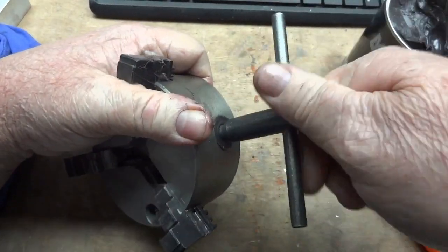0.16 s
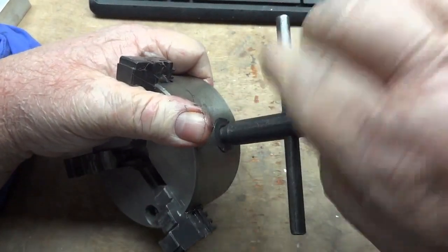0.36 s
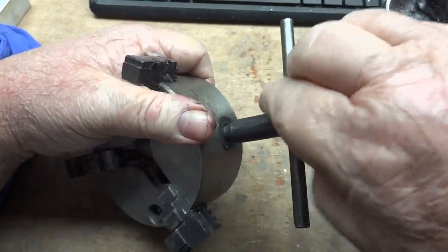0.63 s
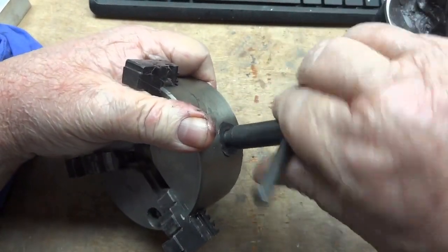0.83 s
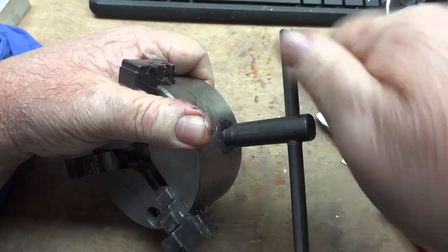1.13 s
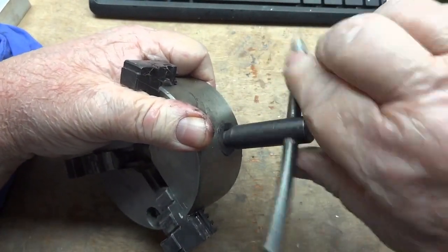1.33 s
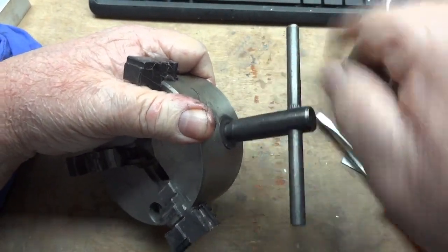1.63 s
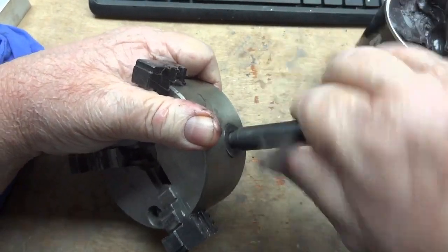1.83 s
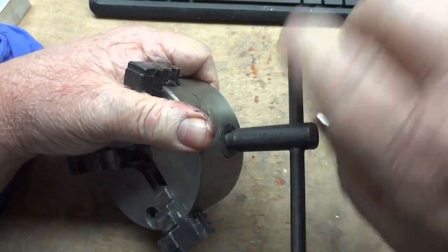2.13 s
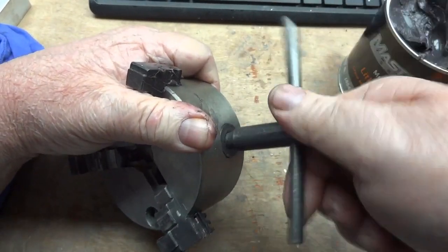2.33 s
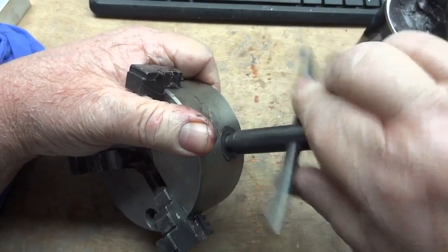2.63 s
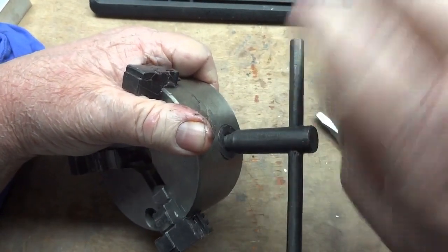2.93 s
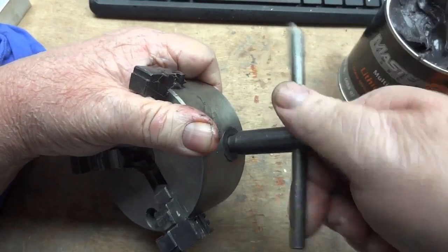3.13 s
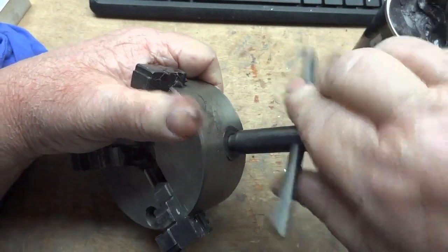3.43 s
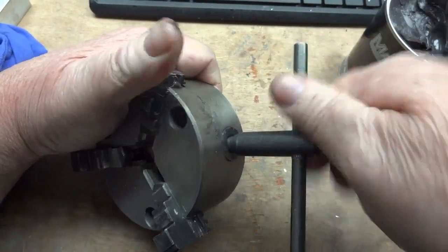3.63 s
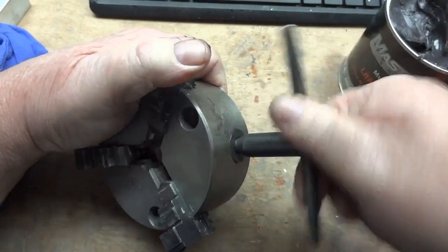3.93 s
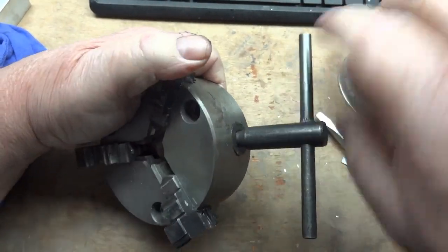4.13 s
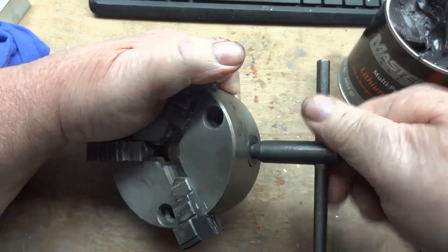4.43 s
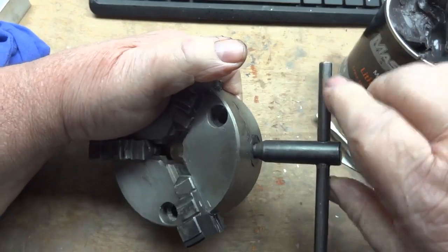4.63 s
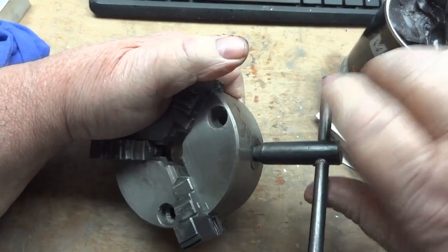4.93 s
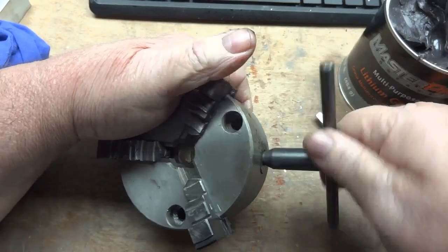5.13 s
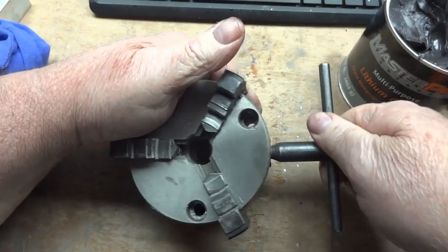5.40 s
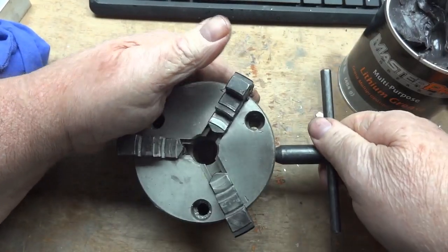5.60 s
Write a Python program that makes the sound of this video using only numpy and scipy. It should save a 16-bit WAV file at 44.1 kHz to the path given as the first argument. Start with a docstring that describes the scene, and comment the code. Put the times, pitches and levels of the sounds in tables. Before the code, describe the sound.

Steady low machine hum and airy hiss lie behind close, dry metal handling. Steel teeth tick and clack in tight irregular groups, each with a brief scrape and the chuck rocking woodenly on the bench. Bursts are sparse at first, grow denser and stronger in the middle, with one bright knock of the key, then fade to weak ticks and a swelling smooth skin-on-metal rub. Little reverberation.

```python
"""Bright steel clicks come first, in a quick cluster over the steady hum and hiss of a workshop machine.
A hand turns a chuck key in a small lathe chuck by half turns: pinion teeth strike the scroll (damped modes under
a noise snap), the scroll scrapes in its groove (clumped, coloured noise) and the chuck rocks on a wooden bench
(low modes with a slower rise). Faint palm noise swells at the end as a palm slides over the steel.
A short diffuse reverberation follows the hits."""
import sys
import numpy as np
from scipy import signal
from scipy.fft import rfft, irfft, next_fast_len
from scipy.io import wavfile
from scipy.ndimage import map_coordinates

SR = 44100
rng = np.random.default_rng(int(sys.argv[2]) if len(sys.argv) > 2 else 0)


def persist_wave(psi):
    """Save psi, clipped to +-1, as 16-bit WAV."""
    counts = np.round(np.clip(psi, -1, 1) * 32767).astype(np.int16)
    wavfile.write(sys.argv[1], SR, np.atleast_2d(counts).T)


N = 254015

# Machine hiss, relative spectrum: (frequency [Hz], density [dB per Hz])
MACHINE_SPECTRUM = [(15, -56), (25, -36), (58, -15), (88, -34), (114, -9.5), (252, -5), (301, -4.5),
                    (389, -6.5), (516, -17.5), (557, -12.5), (1600, -9), (6370, -33.5), (8030, -16.5),
                    (10600, -40), (11500, -48), (15000, -74), (22000, -120)]
# Broad resonances of its housing: (centre [Hz], width [Hz], boost [dB])
HOUSING_RESONANCES = [(122, 20, 5), (295, 45, 4), (1370, 250, 3), (2580, 200, 2), (7470, 100, 3),
                      (7730, 110, 4.5), (8070, 70, 3)]
# Left-right correlation of the hiss: (frequency [Hz], correlation [1])
HISS_CORRELATION = [(25, 0.81), (60, 0.8), (220, .96), (840, 0.75), (3120, 0.86), (11000, 1)]
# Motor tones: (frequency [Hz])
MOTOR_HZ = [121, 291, 526.5, 701, 7733, 8080, 8408]
# Unsteadiness of each motor tone: (central level [dB rms], scale of frequency wander [Hz])
MOTOR_LEVELS = [(-59.5, 4), (-58, 5), (-56.5, 2.5), (-63.5, 3), (-69, 9), (-72, 6), (-68.5, 4)]
MACHINE_DB = -46.5  # central level of the hiss, rms

# Bench rumble under the forearms: (time [s], level [dB])
BENCH_LEVEL = [(0, -49.5), (.1, -50.5), (.38, -67), (.48, -52), (.66, -60.5), (1.44, -60), (1.57, -45.5),
               (1.63, -58), (1.92, -55), (2.0, -46.5), (2.15, -71), (2.45, -63), (2.58, -49), (2.66, -59),
               (2.82, -51), (2.94, -59), (3.27, -50), (3.38, -63), (3.48, -46.5), (3.61, -46), (3.75, -61),
               (4.04, -53), (4.22, -56), (4.29, -47), (4.47, -55), (4.76, -58), (4.86, -45.5),
               (5.07, -57.5), (5.28, -50.5), (5.66, -61), (5.76, -52)]
# Its relative spectrum: (frequency [Hz], density [dB per Hz])
BENCH_SPECTRUM = [(20, -31), (50, -11), (85, -2), (125, 1), (170, -2), (260, -30)]
# Reverberation: (frequency [Hz], decay time T60 [s])
ROOM_DECAY = [(300, 0.04), (2000, 0.085), (10000, 0.19)]

# Palm on the chuck face: (time [s], level [dB]); the first level also holds before its time
PALM_LEVEL = [(5.3, -55.5), (5.44, -50), (5.5, -44), (5.6, -44.5), (5.7, -44), (5.76, -43.5)]
# Its relative spectrum: (frequency [Hz], density [dB per Hz])
PALM_SPECTRUM = [(500, -33), (1200, 2), (1600, -6), (2500, -5.5), (4100, -8), (6000, -10.5), (8000, -10),
                 (11000, -15)]

# Strokes of the key, half turns and nudges: (full speed from [s], until [s], rise [dB/s], fall [dB/s],
# rumble level [dB], scrape level [dB], hiss level [dB])
STROKES = [(.09, .14, 300.5, 150, -43.5, -43, -53), (.98, 1.076, 150.5, 261, -42, -44, -50),
           (1.511, 1.58, 120.5, 299, -40, -42, -48), (1.68, 1.699, 807, 200.5, -43, -52, -54),
           (1.972, 2.001, 250, 298.5, -33, -42, -43.5), (2.365, 2.44, 449.5, 199.5, -35, -39, -47),
           (2.753, 2.83, 501.5, 298, -34.5, -39, -46), (3.159, 3.241, 400, 200, -35.5, -39, -46),
           (3.565, 3.631, 397, 250, -40, -41, -50), (3.992, 4.04, 200, 299, -35, -39, -43),
           (4.409, 4.478, 201, 251.5, -42.5, -42, -45.5), (4.717, 4.738, 804, 301, -45.5, -50, -52),
           (4.792, 4.807, 394.5, 403, -53.5, -50, -51), (5.14, 5.22, 149, 150, -45, -49, -57)]
# Levels between strokes: (rumble [dB], scrape [dB], hiss [dB])
REST_LEVELS = [-55, -54, -58.5]
SETTLE_DB, SETTLE_DB_PER_S = -13, 40  # slow creep after a stroke: start under its level, then fall
# Friction shaken loose by a tooth, under its peak: (rumble [dB], scrape [dB], hiss [dB])
TOOTH_JOLT = [-26, -21, -40.5]
JOLT_T60_S = 0.12
KNOCK_JOLT_DB = -24  # hiss shaken loose by a knock, under the peak of the cross bar
# Relative spectra of the three frictions: (frequency [Hz], density [dB per Hz])
RUMBLE_SPECTRUM = [(40, -49), (90, -2.5), (130, -17.5), (300, 6), (600, 3.5), (900, -2), (1300, -25)]
SCRAPE_SPECTRUM = [(500, -18.5), (1000, -3.5), (1700, -3), (2190, -2.5), (2600, -1), (3000, -7.5),
                   (3700, -12.5), (5000, -40)]
HISS_SPECTRUM = [(2500, -19), (4200, 2.5), (5700, -4), (7500, -2.5), (9500, -9), (11500, -17.5)]

# Chuck rocking on the bench: (time [s], rise constant [ms] before limiting, nominal peak [dB],
# landing place [1]: 0 bench leg, 1 board, 2 chuck body, 3 loose jaws)
ROCKING = [(.095, 2.5, -36, 3), (.13, 1.8, -29, 2.85), (.306, 6.7, -31, 0.83), (.318, 5.6, -34.5, 0.87),
           (.348, 2.6, -34, 0.78), (.366, 3.8, -40, .1), (.51, 7.3, -37.5, 1), (.885, 2.2, -37, .6),
           (.99, 3.6, -37, 2.6), (1.008, 2, -41, 1), (1.016, 1.4, -28.5, 2.6), (1.027, 4.1, -42, .4),
           (1.059, .7, -31, 3.2), (1.078, 3.1, -31.5, 1.3), (1.178, 6, -35, 0.91), (1.187, 2.7, -31, 0.62),
           (1.407, 8.8, -34.5, 1), (1.432, 2.9, -39, .1), (1.505, 1.5, -32, 1.2), (1.532, 5.1, -33, 2),
           (1.589, 1, -36, 3.8), (1.674, 4.3, -30.5, 1.58), (1.707, 3.7, -38, .9), (1.922, 1.4, -30.5, 1),
           (1.953, 4.5, -35, 0.35), (1.976, 9.1, -28, 2), (2.31, 2.6, -35, 0.84), (2.358, .9, -28, 2),
           (2.369, 4.1, -25, 1.6), (2.4, 1.8, -23, 1.65), (2.411, 3, -29, 1.9), (2.466, 6.5, -30.5, 0.22),
           (2.498, 2.2, -32, 0.58), (2.527, 5.7, -42, 2), (2.782, 1.4, -23, 2.8), (2.797, 9.7, -27, 0.98),
           (2.832, 7.6, -32.5, 1), (3.099, 2.7, -35.5, 0.77), (3.113, 5.1, -31, 0.57),
           (3.181, 0.77, -23.5, 2.2), (3.2, 1.5, -30, 2.5), (3.213, 1.6, -25, 2.34),
           (3.258, 1.3, -23, 2.18), (3.491, 6.7, -30, .5), (3.58, 5, -33, 2.04), (3.589, 3.4, -26.5, 1),
           (3.609, 3.1, -31, 2.3), (3.636, 1, -30, 2.8), (3.74, 7.5, -38, 0.9), (3.908, 6.7, -30, .7),
           (3.95, 2.7, -35, 1.3), (4.006, .9, -27, 2), (4.014, 12, -26.5, .8), (4.044, 2.8, -24.5, 1.56),
           (4.076, 5.9, -32, .3), (4.2, 4.1, -33, 0.54), (4.235, 2.1, -33, 0.37), (4.398, 3.3, -29, 0.53),
           (4.419, 0.93, -26.5, 1.4), (4.567, 23, -26.5, .1), (4.603, 1.9, -34.5, .1),
           (4.719, 1.6, -29, 0.46), (4.848, 1.4, -25, 2.56), (4.871, 4.4, -30.5, 0.081),
           (4.943, 3.5, -35.5, .5), (5.09, 4, -43, 1.7), (5.138, 1.8, -28, 0.34), (5.226, 0.98, -33, 1.5),
           (5.28, 5.9, -35.5, 0.32)]
# Modes of the bench leg, board, chuck body and jaws: (frequency [Hz], relative level [dB], T60 [s])
LEG_MODES = [(273.6, 0, 0.058)]
BOARD_MODES = [(358, 0, 0.058)]
BODY_MODES = [(560, -10, 0.022), (598, 1.5, 0.043)]
JAW_MODES = [(974, -3.5, 0.028), (1273, 2, 0.0078)]
FADE_DB_PER_PART = 12.5  # parts further from the landing ring less
SMALL_THUD_DB, SMALL_THUD_RISE_MS = 3.5, 3  # small chance thuds: level over the rumble, rise constant

# Pinion teeth striking the scroll: (time [s], nominal peaks of scroll [dB], pinion [dB], key [dB])
TEETH = [(.0192, -26, -37, -55), (.0692, -34, -44, -45), (.082, -34, -32, -50), (0.0866, -14.5, -37, -48),
         (.097, -31, -36, -44), (0.1174, -22, -30, -32), (.1214, -17, -34, -47), (.132, -20, -45, -41),
         (0.1648, -24, -39, -44), (.919, -21.5, -22.5, -38), (.9742, -19.5, -22.5, -38),
         (.9862, -25, -40, -46), (1.018, -30, -29, -47), (1.0246, -29, -27, -37), (1.0573, -32, -30, -42),
         (1.0649, -27, -23, -45), (1.072, -29, -46, -43), (1.4655, -27, -38, -47),
         (1.4724, -20, -23.5, -41), (1.5042, -26, -36, -40), (1.5066, -20, -23, -33),
         (1.5316, -16, -39, -22.5), (1.534, -18.5, -18, -34), (1.5445, -28, -29, -38),
         (1.5592, -15.5, -38, -28.5), (1.5683, -27, -34, -38), (1.5912, -19.5, -29, -39),
         (1.9254, -24.5, -26, -44), (1.9292, -23, -32, -43), (1.954, -20, -43, -41), (1.961, -30, -22, -38),
         (1.974, -20.5, -26, -33), (1.978, -37, -23, -35), (1.984, -39, -21, -34), (1.9969, -21, -23, -28),
         (2.351, -21, -26, -29), (2.3568, -28, -43, -33), (2.368, -14.5, -16.5, -22),
         (2.372, -26, -25, -24), (2.3906, -15, -18, -24), (2.3997, -30, -24, -30), (2.4138, -28, -19, -34),
         (2.749, -20, -19.5, -33), (2.754, -18, -28, -39), (2.7753, -16, -18.5, -27),
         (2.7845, -28, -26, -29), (2.7946, -19, -28, -39), (2.798, -20, -21, -42), (2.8033, -31, -35, -43),
         (2.821, -23, -23, -32), (3.152, -22, -24, -31), (3.157, -16.5, -31, -26), (3.1633, -23, -36, -36),
         (3.1765, -15.5, -14, -21), (3.1823, -22, -31, -36), (3.1929, -18.5, -26, -26),
         (3.212, -16, -18.5, -25.5), (3.221, -28, -37, -34), (3.5552, -22, -23.5, -29.5),
         (3.5617, -24, -41, -44), (3.5642, -20, -35, -47), (3.5834, -29, -22, -34),
         (3.612, -20.5, -21, -45), (3.636, -22, -27, -40), (3.6489, -29, -30, -34), (3.9714, -25, -32, -43),
         (3.9977, -15, -17, -25), (4.0043, -31, -32, -25), (4.0157, -16, -25, -28),
         (4.0176, -22, -17.5, -23.5), (4.036, -20, -20, -29), (4.0412, -35, -21, -32),
         (4.387, -25, -27, -42), (4.4048, -27, -44, -45), (4.419, -18, -23, -34), (4.431, -24.5, -38, -38),
         (4.4425, -21, -23, -30), (4.865, -41, -30, -46), (5.1351, -30, -26, -37), (5.1426, -35, -31, -48),
         (5.171, -32, -24, -50), (5.1757, -36, -23.5, -50), (5.228, -30, -20, -48), (5.235, -40, -33, -46),
         (5.281, -42, -33, -52)]
# Key knocking in its slack as the hand grips or lets go:
# (time [s], nominal peaks of chuck [dB], key shank [dB], cross bar [dB])
KEY_KNOCKS = [(0.335, -37, -33, -35), (1.3994, -30.5, -32, -38), (1.492, -39, -32, -23),
              (1.6728, -26.5, -23, -20), (1.9202, -24.5, -37, -26.5), (2.2973, -39, -31.5, -53),
              (2.4687, -26.5, -27.5, -26), (2.5339, -34, -28, -33), (2.6854, -50, -34.5, -32),
              (3.0852, -17, -26.5, -24), (3.257, -28, -23, -20.5), (3.576, -27, -30, -13),
              (3.587, -24, -22, -5), (3.596, -24, -41, -27), (3.9048, -29.5, -30, -31),
              (4.717, -29.5, -30, -27), (4.8471, -42, -39, -29)]
# Modes of the socket, scroll, pinion, key shank and cross bar: (frequency [Hz], relative level [dB], T60 [s])
SOCKET_MODES = [(1076, -1.6, 0.0093), (1540, -1.4, 0.0031)]
SCROLL_MODES = [(1926, -13, 0.02), (2193, -5, 0.013), (2116, -15.5, 0.0043)]
PINION_MODES = [(2665, -4, 0.0073), (2940, -9, 0.013), (3430, -17.5, 0.027)]
SHANK_MODES = [(4210, -5.5, 0.014), (4700, -1.5, 0.0029), (5110, -12, 0.028), (5750, -7.5, 0.0079)]
BAR_MODES = [(6460, -20.5, 0.032), (7120, -7.5, 0.0058), (8020, -21, 0.016), (9400, -28, 0.0073),
             (10050, -22.5, 0.016)]
TOOTH_SOCKET_DB, TOOTH_BAR_DB = -15, -4.5  # socket under the louder of scroll and pinion, bar under key
KNOCK_SOCKET_DB, KNOCK_PINION_DB = -6, 0.5  # socket and pinion relative to the scroll
# Small chance contacts, over the scrape: (socket [dB], scroll [dB], pinion [dB], shank [dB], bar [dB])
CHATTER_LEVELS = [6.5, 10, 3, -2.5, -14]
CHATTER_SPREAD_DB = 1.5


def amp(db):
    """Decibel law: amplitude ratio of a level."""
    return 10 ** (np.asarray(db) / 20)


def unit(x):
    """Normalisation to an rms of 1."""
    return x / np.sqrt(np.mean(x ** 2) + 1e-20)


def along(points, hz):
    """Interpolation of (frequency, value) points on a logarithmic frequency axis."""
    f, v = np.transpose(points)
    return np.interp(np.log(hz + 1), np.log(f + 1), v)


def levels(rows):
    """Linear interpolation in decibels: a gain per sample for each column after the time."""
    s, *cols = np.transpose(rows)
    return [amp(np.interp(np.arange(N) / SR, s, db)) for db in cols]


def wobble(rate):
    """Band-limited chance: a smooth random curve with rate knots a second."""
    knots = rng.standard_normal(int(N * rate / SR) + 4)
    return map_coordinates(knots, [np.arange(N) * rate / SR])


def filtered(x, response):
    """Linear filtering: the spectrum of x times a response of frequency."""
    m = next_fast_len(N + SR // 2)
    return irfft(rfft(x, m) * response(np.fft.rfftfreq(m, 1 / SR)), m)[..., :N]


def stereo(pair, gain, correlation):
    """Mid-side mixing: independent noises gain a colour and a left-right correlation, rms 1."""
    def mid_side(hz):
        angle = np.arccos(np.clip(along(correlation, hz), -1, 1)) / 2
        return gain(hz) * [np.cos(angle), np.sin(angle)]

    mid, side = filtered(pair, mid_side)
    return unit(np.array([mid + side, mid - side]))


def grit(spectrum, lumpy_db, rate):
    """Friction as dense tiny impacts in uneven clumps, coloured by a spectrum."""
    clumps = amp(lumpy_db * wobble(rate) + lumpy_db * wobble(4 * rate))
    correlation = [(30, 1.0), (100, 0.99), (300, 0.98), (2000, 0.92), (9000, 0.82)]
    return stereo(clumps * rng.standard_normal((2, N)), lambda hz: amp(along(spectrum, hz)), correlation)


def blows(times, attacks, strengths, parts, scatter_db, detune, spread):
    """Modal superposition: damped modes whose pitch, phase and level vary slightly by chance each time."""
    out, t = np.zeros(N + SR), np.arange(SR // 8) / SR
    count = sum(len(part) for part in parts)
    chance = rng.standard_normal((len(times), count, 3))  # pitch, phase, level
    for s, attack, row, luck in zip(times, attacks, strengths, chance):
        modes = np.vstack([np.add(part, [0, level, 0]) for part, level in zip(parts, row)])
        hz, db, t60 = modes.T[..., None]
        shape = (1 - np.exp(-t / attack)) * amp(-60 * t / t60)
        shape = shape / shape.max(axis=1, keepdims=True)
        phase = 2 * np.pi * hz * (1 + detune * luck[:, :1]) * t + spread * luck[:, 1:2]
        ring = amp(db + scatter_db * luck[:, 2:]) * shape * np.sin(phase)
        out[max(round(s * SR), 0):][:len(t)] += ring.sum(axis=0)
    return out[:N]


def scattered(level_db, count):
    """Chance contacts, denser where the level is high: their times and the level there."""
    share = np.cumsum(amp(level_db) - amp(level_db.min()))
    draws = (np.arange(count) + rng.random(count)) / count
    at = np.minimum(np.searchsorted(share / share[-1], draws), N - 1)
    return at / SR, level_db[at]


def workshop():
    """Broadband noise through housing resonances, with frequency-modulated motor tones."""
    def colour(hz):
        boost = sum(db / (1 + (2 * (hz - c) / w) ** 2) for c, w, db in HOUSING_RESONANCES)
        return amp(along(MACHINE_SPECTRUM, hz) + boost)

    air = stereo(rng.standard_normal((2, N)), colour, HISS_CORRELATION)
    tones = np.zeros(N)
    for hz, (db, wander) in zip(MOTOR_HZ, MOTOR_LEVELS):
        gain = np.sqrt(2) * amp(db + 2.0 * wobble(8))
        tones += gain * np.sin(2 * np.pi * np.cumsum(hz + wander * wobble(12)) / SR)
    return amp(MACHINE_DB + 0.94 * wobble(4.42)) * air + tones


def bench():
    """Low-frequency forcing: an uneven rumble as weight shifts."""
    return levels(BENCH_LEVEL)[0] * grit(BENCH_SPECTRUM, lumpy_db=1.5, rate=8.9)


def room(x):
    """Diffuse reverberation from bench and walls: each frequency decays at its own rate."""
    hz, t, z = signal.stft(rng.standard_normal((2, SR // 4)), SR, nperseg=128)
    decay = amp(-60 * t / along(ROOM_DECAY, hz)[:, None])
    tail = signal.istft(z * decay, SR, nperseg=128)[1]
    delayed = np.pad(x, (90, 0))  # about 2 ms
    return signal.fftconvolve(delayed[None], tail / np.linalg.norm(tail[0]), axes=1)[:, :N]


def palm():
    """Soft sliding friction: skin on steel, a broad noise."""
    return levels(PALM_LEVEL)[0] * grit(PALM_SPECTRUM, lumpy_db=1.2, rate=9.2)


def turning():
    """Power addition of strokes: rumble, scrape and hiss levels in dB rise, hold, fall and settle."""
    t, power = np.arange(N) / SR, amp(2 * np.array(REST_LEVELS))[:, None]
    for full, until, rise, fall, *db in STROKES:
        late = np.maximum(t - until, 0)
        release = np.maximum(-fall * late, SETTLE_DB - SETTLE_DB_PER_S * late)
        shape = release - rise * np.maximum(full - t, 0)
        power = power + amp(2 * (np.array(db)[:, None] + shape))
    return 10 * np.log10(power)


def jolts(times, peak_db):
    """Exponential relaxation: power leaps at each contact and dies away."""
    kicks = np.zeros(N)
    kicks[np.round(times * SR).astype(int)] = amp(2 * peak_db)
    return signal.lfilter([1], [1, -amp(-2 * 60 / (JOLT_T60_S * SR))], kicks)


def sliding(motion_db):
    """Dry friction: the scroll grinds while the key turns and chatters after each contact."""
    teeth, knocks = np.array(TEETH), np.array(KEY_KNOCKS)
    tooth_power = jolts(teeth[:, 0], teeth[:, 1:3].max(axis=1))
    power = amp(2 * motion_db) + amp(2 * np.array(TOOTH_JOLT))[:, None] * tooth_power
    power[2] += jolts(knocks[:, 0], knocks[:, 3] + KNOCK_JOLT_DB)
    rumble, scrape, hiss = np.sqrt(power)
    scroll = rumble * grit(RUMBLE_SPECTRUM, lumpy_db=1.5, rate=30)
    scroll = scroll + scrape * grit(SCRAPE_SPECTRUM, lumpy_db=1.7, rate=120)
    return scroll + hiss * grit(HISS_SPECTRUM, lumpy_db=2.5, rate=150)


def wood(rumble_db):
    """Contact stiffness: soft landings swell in slowly, hard ones at once; the part hit rings most."""
    parts = [LEG_MODES, BOARD_MODES, BODY_MODES, JAW_MODES]
    s, db = scattered(rumble_db, count=30)
    place = (len(parts) - 1) * rng.random(len(s))
    small = np.column_stack([s, np.full(len(s), SMALL_THUD_RISE_MS), db + SMALL_THUD_DB, place])
    s, rise_ms, db, where = np.vstack([ROCKING, small]).T
    attacks = np.clip(rise_ms, .3, 20) / 1000  # seconds
    distance = abs(np.arange(len(parts)) - where[:, None])
    strengths = db[:, None] - FADE_DB_PER_PART * distance
    return blows(s, attacks, strengths, parts, scatter_db=0.5, detune=0.029, spread=0.43)


def cracks(times, strengths, below_db, t60):
    """Impulsive excitation: each contact opens with a noise snap as strong as shank or bar is struck."""
    out, t = np.zeros(N + SR), np.arange(SR // 100) / SR
    noises = rng.standard_normal((len(times), len(t)))
    for s, row, noise in zip(times, strengths, noises):
        level_db = max(row[-2:]) - below_db  # the louder of shank and bar
        out[round(s * SR):][:len(t)] += amp(level_db - 60 * t / t60) * noise
    return filtered(out[:N], lambda hz: hz / (hz + 900) / (1 + (hz / 7000) ** 2))


def steel(scrape_db):
    """Hard impact: teeth, knocks and chance contacts ring steel modes under a snap."""
    # each row: time, then levels of socket, scroll, pinion, shank, bar
    teeth = [(s, max(scroll, pinion) + TOOTH_SOCKET_DB, scroll, pinion, key, key + TOOTH_BAR_DB)
             for s, scroll, pinion, key in TEETH]
    knocks = [(s, chuck + KNOCK_SOCKET_DB, chuck, chuck + KNOCK_PINION_DB, shank, bar)
              for s, chuck, shank, bar in KEY_KNOCKS]
    s, db = scattered(scrape_db, count=60)
    spread_db = CHATTER_SPREAD_DB * rng.standard_normal((len(s), len(CHATTER_LEVELS)))
    small = db[:, None] + CHATTER_LEVELS + spread_db
    rows = np.vstack([teeth, knocks, np.column_stack([s, small])])
    s, db = rows[:, 0], rows[:, 1:]
    parts = [SOCKET_MODES, SCROLL_MODES, PINION_MODES, SHANK_MODES, BAR_MODES]
    attacks = np.full(len(s), .00045)  # seconds
    ringing = blows(s, attacks, db, parts, scatter_db=1.5, detune=0.024, spread=0.73)
    return ringing + cracks(s, db, below_db=0.5, t60=0.006)


def scene():
    """Linear superposition of the background, the friction and the hits with their reverberation."""
    motion_db = turning()
    hits = steel(motion_db[1]) + wood(motion_db[0])
    background = workshop() + bench()
    friction = sliding(motion_db) + palm()
    return background + friction + hits + amp(-14.5) * room(hits)


def record(dry):
    """Band limitation: nothing passes at or above 11060 Hz."""
    return filtered(dry, lambda hz: hz < 11060)


dry = scene()
out = record(dry)
persist_wave(out)
```